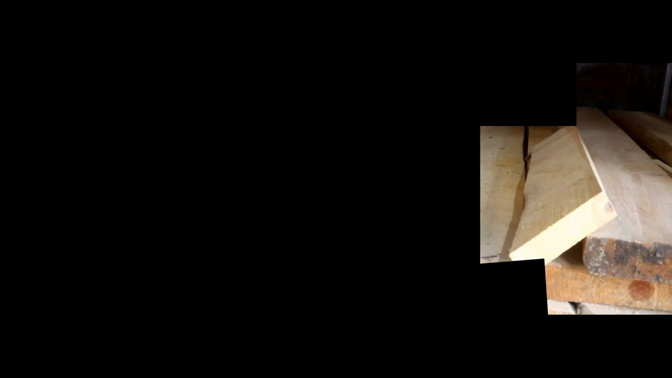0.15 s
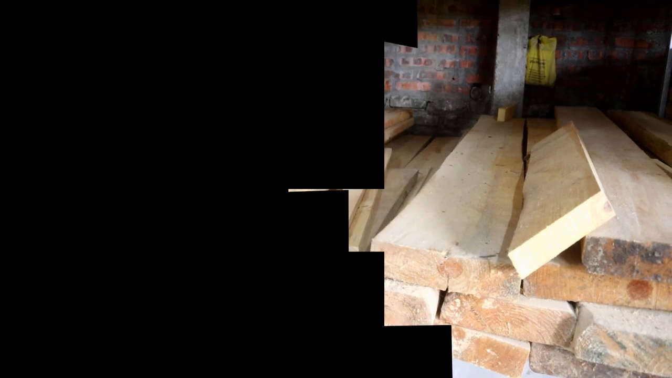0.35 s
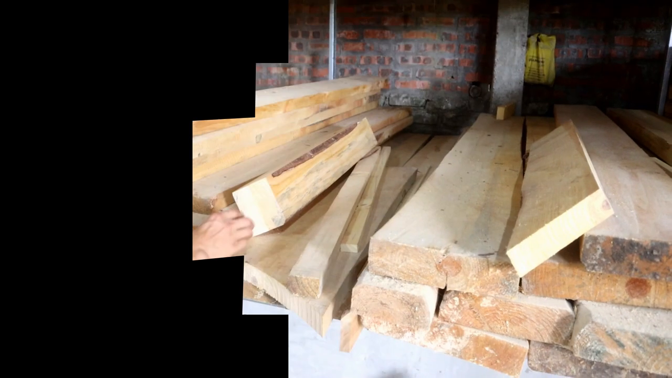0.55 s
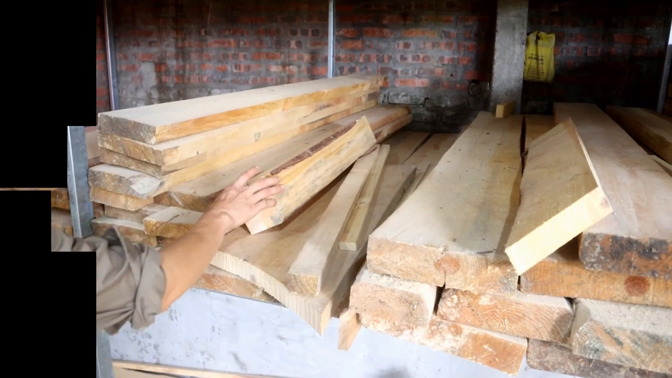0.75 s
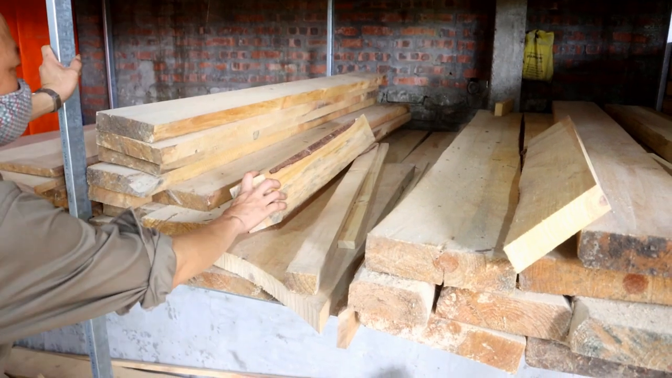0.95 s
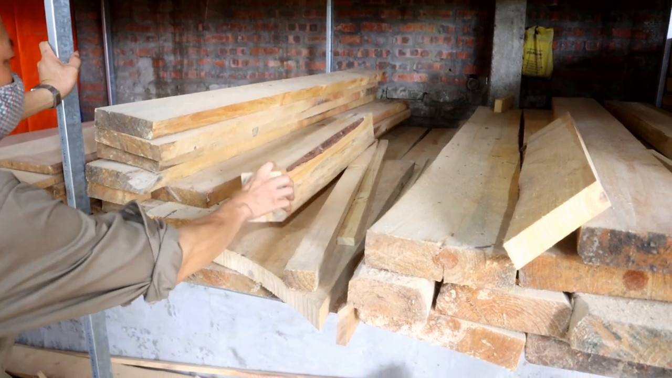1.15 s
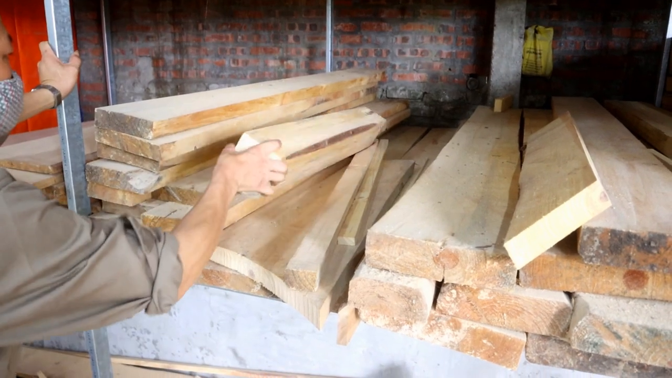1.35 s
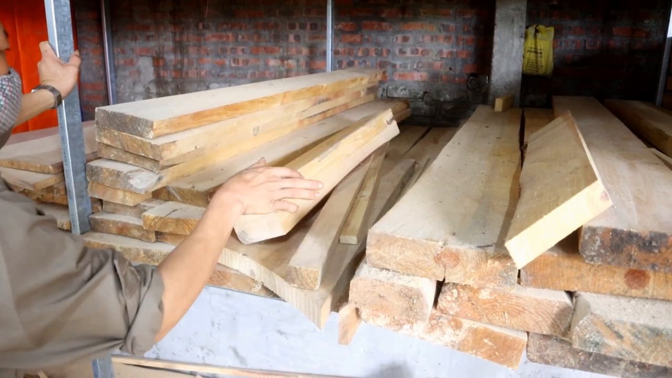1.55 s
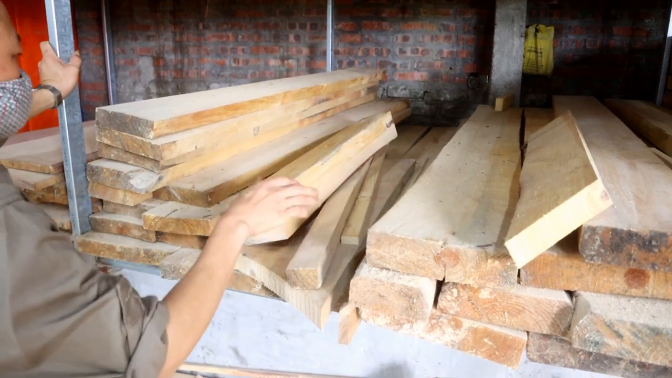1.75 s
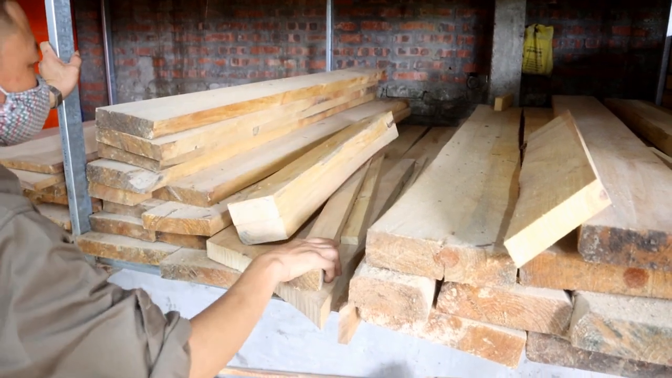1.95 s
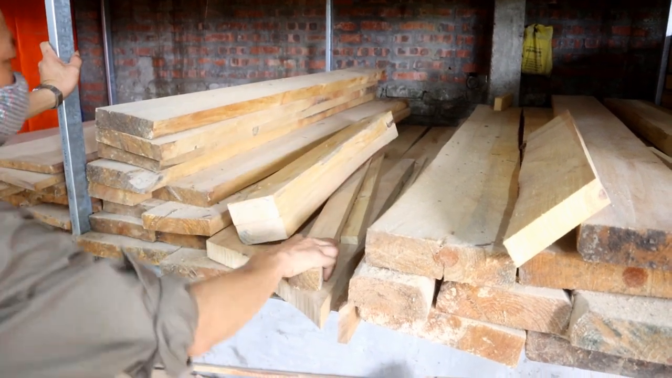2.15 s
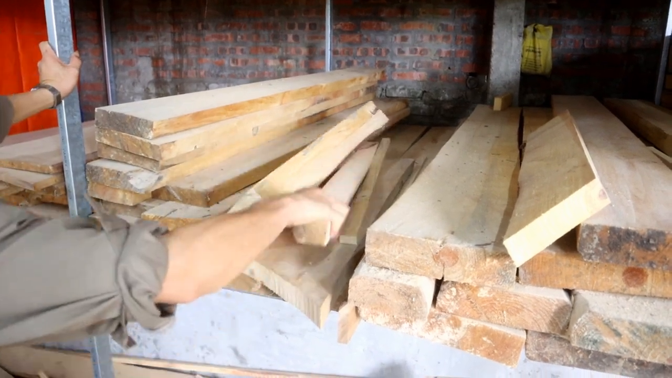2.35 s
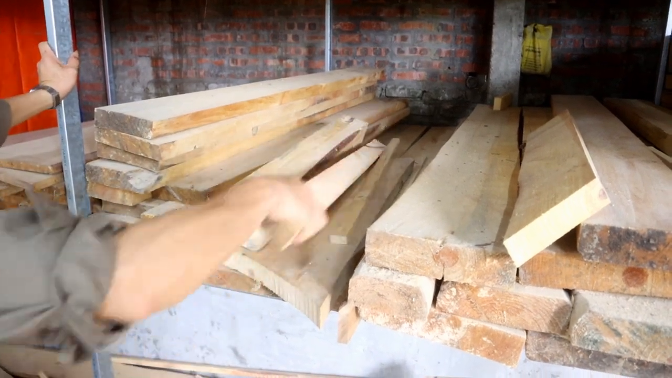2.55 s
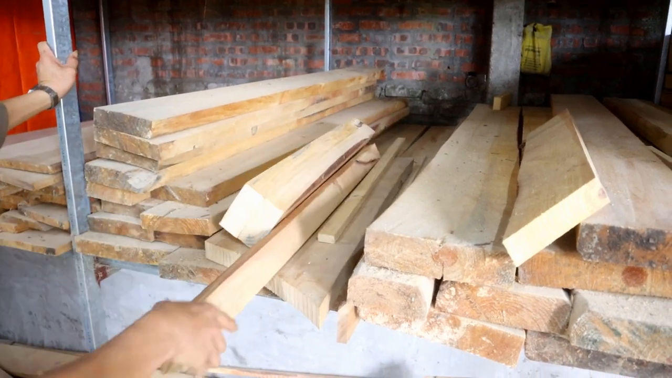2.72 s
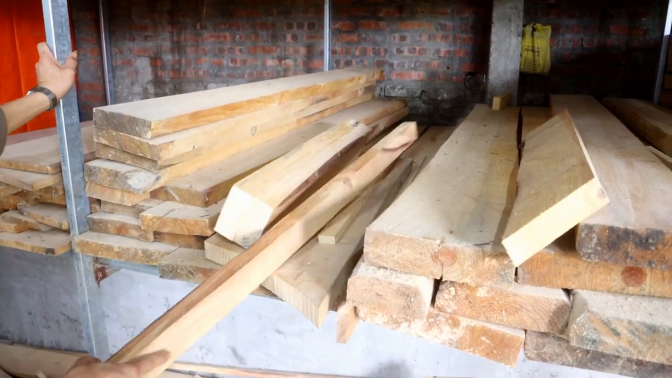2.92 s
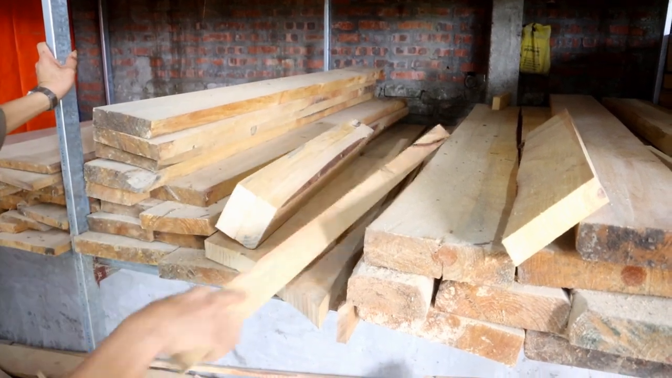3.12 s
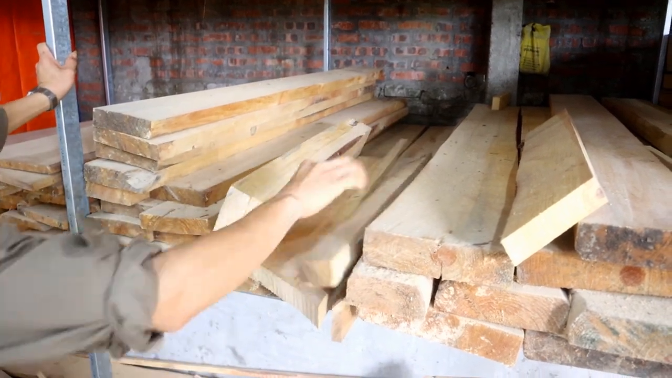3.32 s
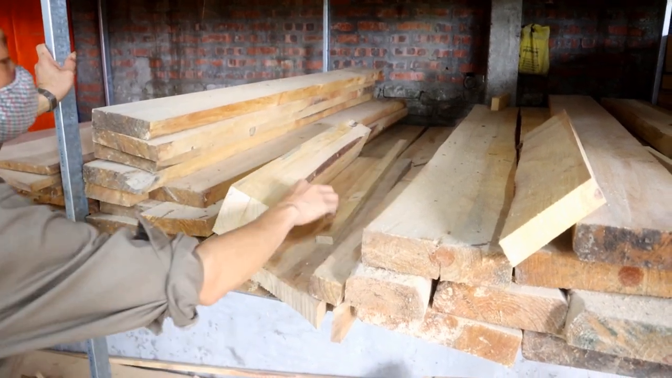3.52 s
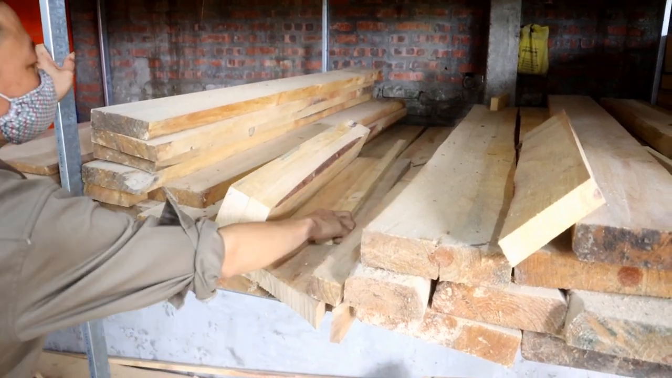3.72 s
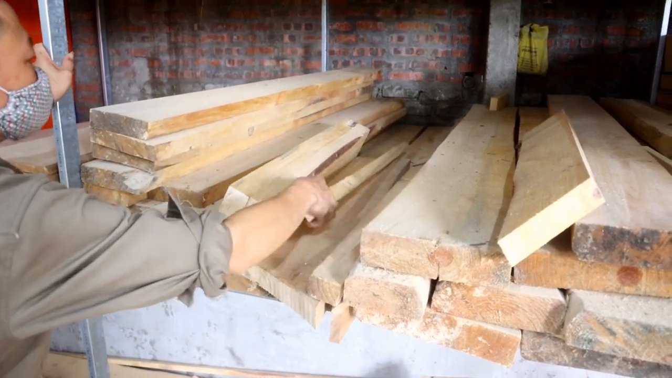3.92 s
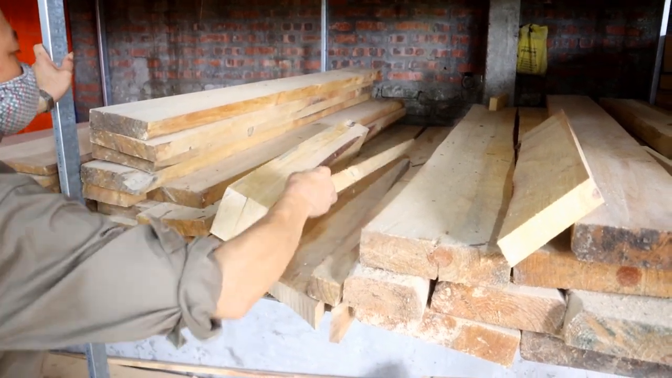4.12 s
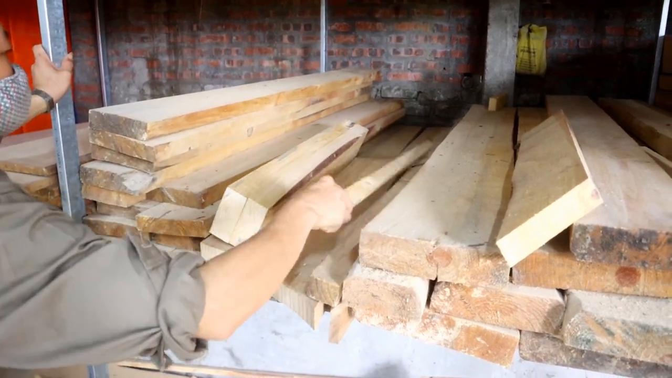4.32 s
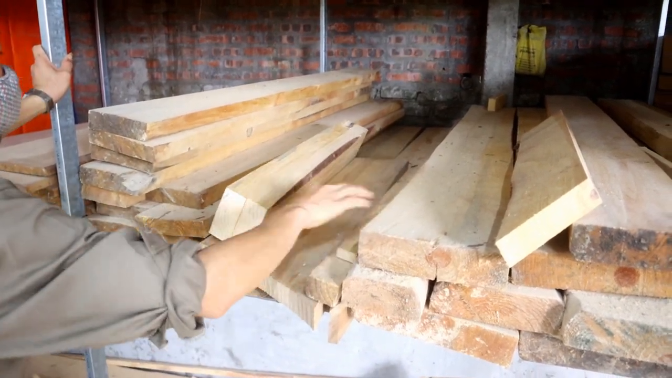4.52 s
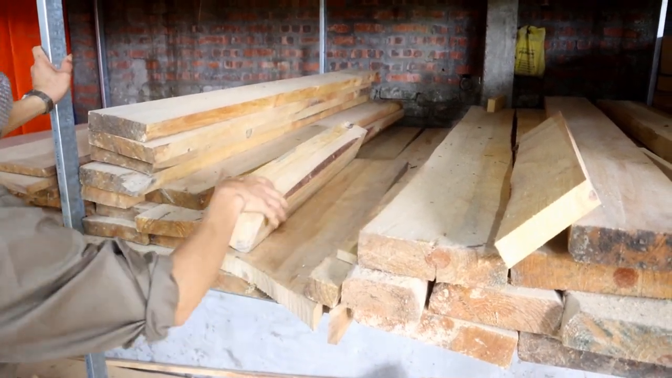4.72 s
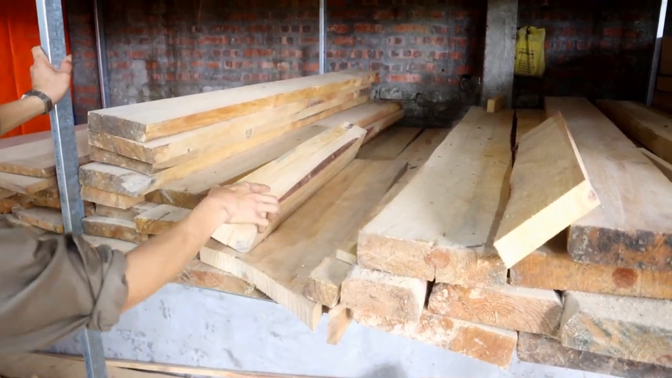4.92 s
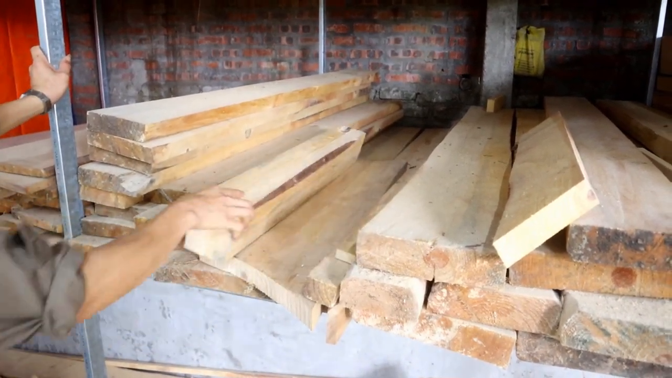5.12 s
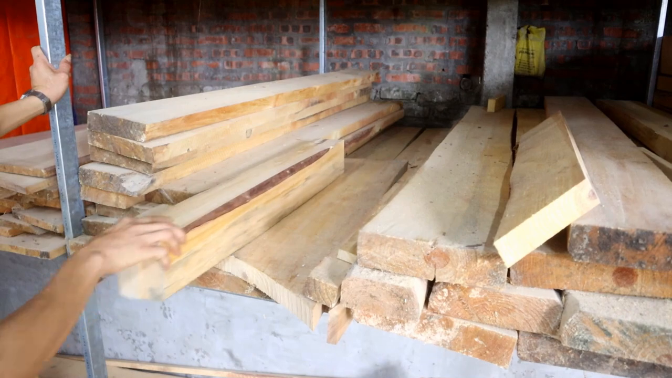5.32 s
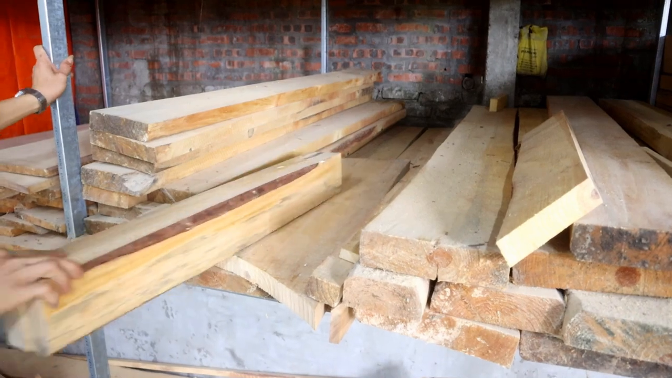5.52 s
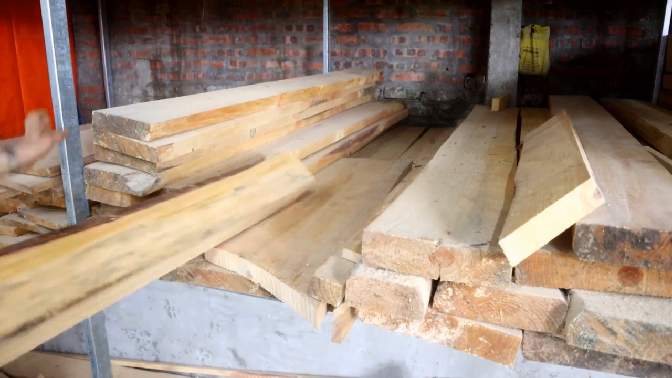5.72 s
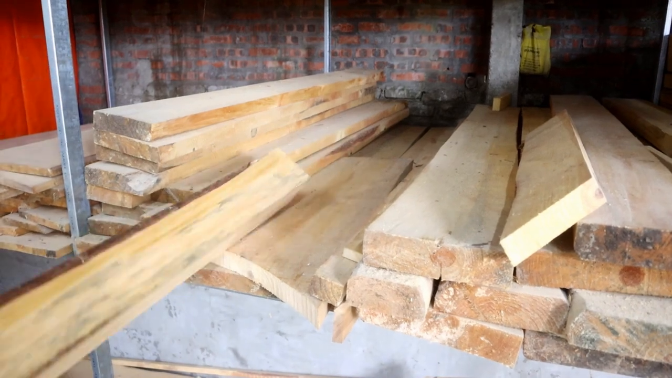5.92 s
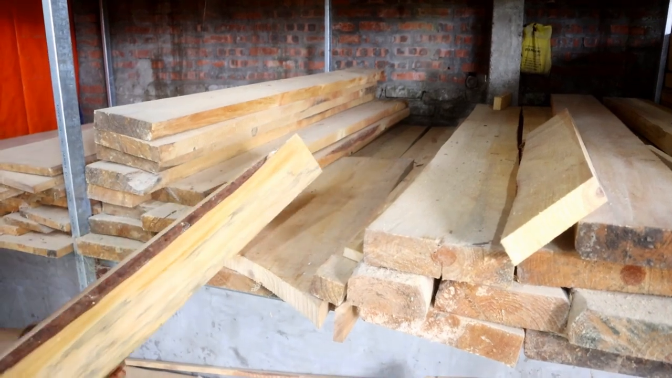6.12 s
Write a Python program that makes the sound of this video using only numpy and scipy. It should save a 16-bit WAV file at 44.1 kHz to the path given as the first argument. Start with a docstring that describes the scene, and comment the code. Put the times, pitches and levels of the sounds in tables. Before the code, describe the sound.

In an echoing brick workshop, sawn timber is sorted on a stack. Rough scraping and faint sleeve rustle lead to a hard, sharp beam knock with rocking bumps. A short squeak precedes another heavy drop, then a batten and a thin slat clatter. Finally a beam thumps and is dragged clear. A low throbbing hum and soft rumble continue underneath. Close stereo microphone.

```python
"""Sawn timber is sorted on a stack in a brick workshop, over a throbbing tone and a filtered-noise rumble.
Rough faces scrape as shaped, uneven noise and a sleeve rustles as brighter noise; then thick beams knock,
each blow exciting decaying modes and a dense noise ring of the pile, with sharp snaps and rocking bumps.
A wavering sine squeaks before a beam drops; a plank is struck, a batten and a thin slat clatter down,
and at last more beams land while one is pulled clear, ringing. Decaying noise gives the room echo."""
import sys
import numpy as np
from scipy import signal
from scipy.fft import rfft, irfft, next_fast_len
from scipy.io import wavfile
from scipy.ndimage import uniform_filter1d, map_coordinates

SR = 44100
rng = np.random.default_rng(int(sys.argv[2]) if len(sys.argv) > 2 else 0)


def materialize(psi):
    """Save the field psi as 16-bit PCM at rate SR to the path in sys.argv[1].

    A 1-D psi becomes a single channel; in a 2-D psi each row is a channel.
    """
    bounded = np.clip(np.atleast_2d(psi).T, -1, 1)
    quanta = np.round(bounded * 32767).astype(np.int16)
    wavfile.write(sys.argv[1], SR, quanta)


N = 271699
TIME = np.arange(N) / SR


def undb(db):
    """Amplitude gain is ten to the power of decibels over twenty."""
    return 10 ** (np.asarray(db) / 20)


def unit(x):
    """Normalization: scale to rms 1."""
    return x / np.sqrt(np.mean(x ** 2))


def curve(rows):
    """Linear interpolation joins (s, value) rows over time."""
    return np.interp(TIME, *np.transpose(rows))


def colour(x, points):
    """Minimum-phase filtering through (Hz, dB) points: a folded cepstrum makes the response causal."""
    size = next_fast_len(len(x) + 4096)
    hz, db = np.transpose(points)
    bins_hz = np.arange(size // 2 + 1) * SR / size
    log_gain = np.log(undb(np.interp(np.log(bins_hz + 1), np.log(hz), db)))
    cepstrum = irfft(log_gain, size)
    cepstrum[1:size // 2] *= 2
    cepstrum[size // 2 + 1:] = 0
    response = np.exp(rfft(cepstrum))
    return irfft(rfft(x, size) * response, size)[:len(x)]


def band(x, lo_hz, hi_hz):
    """Causal Butterworth band-pass, flat between its edges."""
    return signal.sosfilt(signal.butter(3, [lo_hz, hi_hz], "band", fs=SR, output="sos"), x)


def walk(rate):
    """Random modulation: noise drawn rate times a second, smoothed twice, with rms near 1."""
    k = int(SR / rate)
    steps = np.repeat(rng.standard_normal(N // k + 1), k)
    smooth = uniform_filter1d(uniform_filter1d(steps, k), k)
    return unit(smooth)[:N]


def fade(t, t60):
    """Exponential decay of a damped vibration, 60 dB down at t60 seconds."""
    return np.exp(-np.log(1000) * t / t60)


def ring(modes, t, scatter_db, detune):
    """Modal superposition: the point of contact sets the shares, the support shifts the pitches."""
    hz, db, t60 = np.transpose(modes)[:, :, None]
    share, shift, sign = rng.standard_normal((3, len(modes), 1))
    strength = np.sign(sign) * undb(db + scatter_db * share)
    vibration = np.sin(2 * np.pi * hz * (1 + detune * shift) * t)
    return np.sum(strength * fade(t, t60) * vibration, axis=0)


def grains(grain_db, rate, patchy_db):
    """Amplitude-modulated noise: dense tiny slips of uneven size, coming in mild patches."""
    sizes = np.repeat(rng.uniform(-1, 1, N // 64 + 1), 64)[:N]
    return rng.standard_normal(N) * undb(grain_db * sizes + patchy_db * walk(rate))


def hum(tone_db=1, rumble_db=4.5, waver=0.0299, depth_db=20, uneven_db=1):
    """Frequency and amplitude modulation: a wavering low tone throbs, over a rumble of filtered noise."""
    # centre of the wavering pitch: start_s, pitch_hz
    pitch = [(0, 111.9), (1.6, 119.4), (2.1, 115.6), (2.35, 93.2), (6.16, 88.5)]
    # throbs of the tone: start_s, throbs_per_s
    throb_rate = [(0.9, 7.6), (1.25, 5.6), (2.6, 7.3), (4.3, 8.1), (5.6, 7.0)]
    # tone at the top of a throb, before tone_db: start_s, level_db
    tone_level = [(0.1, -61), (0.6, -40.5), (1.4, -27), (2.0, -35.5), (2.5, -31), (3.3, -38.5),
                  (4.4, -42.5), (6.1, -33.5)]
    # rumble before rumble_db: start_s, level_db
    rumble_level = [(0.15, -65.5), (0.6, -48.5), (1.3, -40.5), (2.5, -39.5), (4.1, -47), (5.7, -47)]
    # rumble spectrum: frequency_hz, level_db
    rumble_points = [(20, -16.5), (48, -2.5), (110, 2.5), (165, -3), (240, -8), (400, -19), (2000, -73)]
    beat = np.cumsum(curve(throb_rate)) / SR
    throb_db = uneven_db * walk(6.1) - depth_db * np.sin(np.pi * beat + np.pi / 3) ** 2
    wavering_hz = curve(pitch) * (1 + waver * walk(20))
    tone = np.sqrt(2) * np.sin(2 * np.pi * np.cumsum(wavering_hz) / SR)
    rumble = unit(colour(rng.standard_normal(N), rumble_points))
    rumble = rumble * undb(curve(rumble_level) + rumble_db)
    return tone * undb(curve(tone_level) + throb_db + tone_db) + rumble


def sliding(stroke_power=0.83, stroke_t60_s=0.61):
    """Friction noise grows with speed: each stroke accelerates, then dies away; powers add."""
    # boards pushed or pulled over the pile, relative levels: start_s, stop_s, scrape_db, splinter_hiss_db
    strokes = [(0.104, 1.58, -46, -64), (1.7, 2.331, -49.5, -74.5), (1.77, 1.839, -39.5, -76),
               (2.323, 2.618, -39.5, -54), (2.725, 2.893, -35.5, -66), (3.095, 4.186, -57.5, -73),
               (3.92, 4.5, -58.5, -72), (5.145, 5.388, -40.5, -53.5), (5.45, 5.601, -44, -54),
               (5.646, 5.744, -43, -53), (5.77, 6.125, -49, -58)]
    power = 0
    for start, stop, scrape_db, hiss_db in strokes:
        speed = np.clip((TIME - start) / (stop - start), 0, 1) ** stroke_power
        speed = speed * fade(np.maximum(TIME - stop, 0), stroke_t60_s)
        power = power + np.outer(undb([scrape_db, hiss_db]), speed) ** 2
    return np.sqrt(power)


def scrape(strength, modes_db=-5, level_db=3, pull_s=5.55, pull_length_s=0.27):
    """Stick-slip of sawn faces sounds the pile; slips also drive the shifting modes of a beam pulled clear."""
    # modes of the dragged beam: frequency_hz, level_db, t60_s
    drag_modes = [(560, -2.5, 0.056), (1050, 0, 0.023), (1220, 5.5, 0.043), (1652, 0.5, 0.067),
                  (1980, 3.5, 0.015)]
    # scrape spectrum: frequency_hz, level_db
    scrape_points = [(100, -9), (250, 6.5), (740, 5), (950, 1), (1250, -1), (2300, -6.5), (3500, -16),
                     (6000, -26), (12000, -56.5)]
    slips = grains(grain_db=7, rate=45, patchy_db=1.6)
    response = ring(drag_modes, TIME[:SR // 2], scatter_db=0.0, detune=0)
    beam = signal.fftconvolve(slips, response)[:N]
    # reading the ringing at an uneven pace shifts its modes
    reading_points = np.cumsum(1 + .035 * walk(18))
    beam = map_coordinates(beam, [reading_points], mode="mirror") * undb(3 * walk(35))
    pulled = np.exp(-((TIME - pull_s) / pull_length_s) ** 2)
    rubbing = unit(slips) + undb(modes_db) * pulled * unit(beam)
    return unit(colour(rubbing, scrape_points)) * strength * undb(level_db)


def rustle(splinters, level_db=2, rest_db=-73, reach_s=0.059):
    """Broadband friction noise: sleeve and splinters brush the wood, their powers adding."""
    # arm reaches, before level_db: centre_s, level_db
    reaches = [(0.64, -66), (1.291, -55.5), (2.44, -62), (3.92, -64), (4.33, -64.5), (4.831, -63),
               (5.03, -64)]
    # brushing spectrum: frequency_hz, level_db
    cloth_points = [(800, 6), (2500, 12.5), (4500, 7), (7000, -1.5), (9000, -10), (13000, -20.5),
                    (16000, -41)]
    brushing = grains(grain_db=5, rate=25, patchy_db=1.5)
    sleeve = undb(rest_db) + sum(undb(db) * np.exp(-((TIME - s) / reach_s) ** 2) for s, db in reaches)
    return unit(colour(brushing, cloth_points)) * np.hypot(splinters, sleeve) * undb(level_db)


def knocks(rows, modes, modes_db, detune, thock_db, pile_t60, contact_db, attack_s, bands_db):
    """Impact excitation: a contact crunch, a thock, the piece's modes and the pile's dense ring."""
    # pile spectrum: frequency_hz, level_db
    pile_points = [(40, -6), (110, 8.5), (220, 5), (500, 4.5), (750, 5), (1050, 4), (1450, 10.5),
                   (2500, -1), (3600, -7), (5000, -14), (7000, -20), (14000, -66.5)]
    # edges between thud, body, clack and crack: frequency_hz
    edges_hz = [45, 250, 900, 2800, 13000]
    # a deep thock comes with a heavy thud
    thud_db_per_octave, thud_pivot_hz = -7, 392
    # a hard edge is brighter than a flat face: gain from softest to hardest
    hard_clack_db, hard_crack_db = 21.5, 45
    out, t = np.zeros(N + SR), np.arange(SR // 2) / SR
    for s, level_db, hardness, thock_hz in rows:
        envelope = fade(t, pile_t60) + undb(contact_db) * fade(t, 0.058)
        dense = rng.standard_normal(len(t)) * envelope
        # wood gives before the pile takes the blow, and for longer when the blow is gentle
        give_s = np.clip(attack_s * undb(-2 * level_db - 22), .0005, .005)
        dense *= 1 - np.exp(-t / give_s)
        thock = undb(thock_db) * np.sin(2 * np.pi * thock_hz * t) * fade(t, 0.06)
        piece = undb(modes_db) * ring(modes, t, scatter_db=4.0, detune=detune)
        blow = colour(dense + thock + piece, pile_points)
        thud, body, clack, crack = (band(blow, lo, hi) for lo, hi in zip(edges_hz, edges_hz[1:]))
        # wood soaks up the crack quickly
        parts = np.array([thud * fade(t, 0.64), body, clack, crack * fade(t, 0.24)])
        thud_tilt_db = thud_db_per_octave * np.log2(thock_hz / thud_pivot_hz)
        tilt_db = np.array([thud_tilt_db, 0, hard_clack_db * hardness, hard_crack_db * hardness])
        # each band is levelled over its first 25 ms
        gains = undb(level_db + np.array(bands_db) + tilt_db) / np.std(parts[:, :SR // 40], axis=1)
        out[int(s * SR):][:len(t)] += gains @ parts
    return out[:N]


def beam_knocks():
    """Bending and twisting modes of thick beams, excited by impact and by rocking."""
    # blows: start_s, relative level_db, hardness (0-1), thock pitch_hz
    blows = [(0.287, -35, 0.7, 855), (1.254, -23.5, 0, 722), (1.268, -23.5, 0, 347), (1.665, -30, 0.3, 396),
             (1.679, -21.5, 0.2, 597), (1.698, -11, 0.62, 1390), (1.7, -19, 0.05, 308),
             (1.704, -12, 0.5, 707), (1.718, -13, 0.4, 814), (1.792, -20.5, 0, 675),
             (1.861, -16.5, 0.3, 278), (1.876, -14.5, 0.2, 706), (2.606, -19, 0.5, 210),
             (2.65, -8, 0.08, 536), (2.692, -22, 0.03, 573), (2.785, -16.5, 0, 658), (2.824, -18, 0, 712),
             (2.876, -12.5, 0.4, 386), (2.889, -15.5, 0.1, 231.5), (2.921, -16, 0.2, 372),
             (3.24, -31.5, 0.76, 584), (3.248, -19.5, 0, 318), (3.262, -22.5, 0, 478),
             (3.296, -39, 0.93, 592), (3.609, -13.5, 0.15, 640), (5.016, -40, 1, 308),
             (5.264, -28.5, 0, 165), (5.378, -9.5, 0.05, 342), (5.45, -21.5, 0.4, 263),
             (5.517, -35, 1, 506), (5.926, -11, 0.08, 427), (5.942, -14, 0.15, 595), (6.094, -14, 0, 298),
             (6.107, -23, 0.3, 805)]
    # modes before detuning and scatter: frequency_hz, level_db, t60_s
    modes = [(101, -7, 0.3), (167, -0.5, 0.089), (220.3, -3.5, 0.33), (319.8, 3.5, 0.078),
             (371, 5.5, 0.082), (410.4, -1, 0.31), (555.6, 4.5, 0.09), (686, -2.5, 0.18), (717, 4.5, 0.028),
             (1400, 4, 0.024), (1630, -5, 0.051), (1970, 1, 0.1)]
    # bands_db, here and below: thud, body, clack and crack of the softest contact
    return knocks(blows + settling(), modes, modes_db=-20, detune=0.0096, thock_db=-6.5, pile_t60=0.15,
                  contact_db=-1.5, attack_s=0.0014, bands_db=[-12.5, -7.5, -28.5, -60.5])


def snaps(snap_t60=0.0089, splinter_db=-22, clack_hz=1200, clack_t60=0.038):
    """Impulsive contact: a corner bites in a bright click with a splintery tail and an octave-wide clack."""
    # hard edges snapping, levels before the final colouring and halving: start_s, click_db, clack_db
    bites = [(1.2719, -29.5, -45), (1.7016, -13.5, -7), (2.6517, -21, -24), (3.437, -22.5, -26),
             (3.551, -33, -8.5), (4.664, -36, -28), (5.38, -31, -15.5), (5.943, -40, -17.5),
             (2.967, -44.5, -21)]
    (click, clack), t = np.zeros((2, N)), np.arange(SR // 10) / SR
    for s, click_db, clack_db in bites:
        bite, wood = rng.standard_normal((2, len(t)))
        splintery = fade(t, snap_t60) + undb(splinter_db) * fade(t, 0.092)
        click[int(s * SR):][:len(t)] += undb(click_db) * bite * splintery
        woody = unit(band(wood, clack_hz / np.sqrt(2), clack_hz * np.sqrt(2)))
        clack[int(s * SR):][:len(t)] += undb(clack_db) * woody * fade(t, clack_t60)
    bright = colour(click, [(200, 2), (2600, 3), (6000, -13), (8500, -13), (11000, -27.5), (14000, -27)])
    return clack / 2 + bright


def settling(count=7, hardness=0.089, thock_hz=520, spread_octaves=.4, ends_db=-5):
    """Repeated impact: a rocking beam gives soft, uneven bumps, strongest midway, as rows of blows."""
    # dropped beams rocking: start_s, length_s, relative level_db
    rockings = [(1.803, 0.17, -22), (2.67, .2, -18), (5.398, 0.063, -29)]
    rows = []
    for start, length, level_db in rockings:
        slip, pitch = rng.uniform(-1.1, 1, (count, 2)).T
        along = (np.arange(count) + .5 + slip / 2) / count
        for u, p in zip(along, pitch):
            bump_db = level_db + ends_db * (2 * u - 1) ** 2
            rows.append((start + length * u, bump_db, hardness, thock_hz * 2 ** (spread_octaves * p)))
    return rows


def squeak(hz=2300, level_db=-35, start_s=2.556, stop_s=2.651):
    """Stick-slip oscillation: a rough squeak of jittered pitch and level grows until the beam drops."""
    phase = 2 * np.pi * np.cumsum(hz * (1 + .016 * walk(700))) / SR
    growth = np.clip((TIME - start_s) / (stop_s - start_s), 0, 1)
    pressure = growth * np.clip((stop_s - TIME) / .004, 0, 1)
    return undb(level_db + 3 * walk(300)) * np.sin(phase) * pressure


def plank_knocks():
    """Modes of the plank underneath, excited by impact of the batten's far end."""
    # blows: start_s, relative level_db, hardness (0-1), thock pitch_hz
    blows = [(2.954, -17, 0.27, 972), (2.964, -23, 0.28, 1240), (3.518, -23.5, 0.79, 327),
             (3.543, -12, 0.39, 697), (3.553, -11.5, 0.39, 470)]
    # modes before detuning and scatter: frequency_hz, level_db, t60_s
    modes = [(213, 3, 0.071), (961, -9.5, 0.059), (1070, -10.5, 0.1), (1374, 0, 0.16), (1658, 14, 0.12),
             (1640, -5.5, 0.053), (1900, 4, 0.12)]
    return knocks(blows, modes, modes_db=-8.5, detune=0.014, thock_db=-4.0, pile_t60=0.18,
                  contact_db=4.5, attack_s=0.00044, bands_db=[-7.5, -8, -21.5, -49.5])


def batten_knocks():
    """Bending and twisting modes of a long batten, excited as it clatters down."""
    # blows: start_s, relative level_db, hardness (0-1), thock pitch_hz
    blows = [(3.407, -14, 0.72, 533), (3.415, -17.5, 0.59, 896), (3.428, -17, 0.95, 490),
             (3.436, -16, 0.83, 360), (3.462, -14.5, 0, 730), (3.473, -20, 0, 743)]
    # modes before detuning and scatter: frequency_hz, level_db, t60_s
    modes = [(234, -4.5, 0.23), (400, -7.5, 0.14), (1253, -4.5, 0.15), (1916, 3.5, .09), (2200, 0.5, 0.061),
             (2574, 5, 0.043), (3090, 0, 0.04), (3440, -0.5, 0.042)]
    return knocks(blows, modes, modes_db=-11.5, detune=0.0066, thock_db=-10.5, pile_t60=0.18,
                  contact_db=-4, attack_s=0.00086, bands_db=[-11.5, -7.5, -29.5, -54.5])


def slat_knocks():
    """Bending and twisting modes of a thin slat, excited as it falls."""
    # blows: start_s, relative level_db, hardness (0-1), thock pitch_hz
    blows = [(4.54, -18, 0.42, 1034), (4.553, -16.5, 0.49, 1350), (4.651, -14.5, 0.43, 980),
             (4.667, -13.5, 0.55, 495), (4.694, -24, 0.241, 1270)]
    # modes before detuning and scatter: frequency_hz, level_db, t60_s
    modes = [(229.3, 2, 0.15), (336, -6.5, 0.14), (460, -4.5, 0.079), (583, -6.5, 0.17), (863, -8, 0.23),
             (988, -1, 0.13), (1192, -0.5, 0.046), (1246, -2, 0.28), (1334, -1.5, 0.17), (1370, -6, 0.14),
             (1654, -12, 0.11), (2035, 0, 0.079), (2472, 7.5, 0.093), (3540, 5.5, 0.076), (3970, 3, 0.032)]
    return knocks(blows, modes, modes_db=-12.5, detune=0.012, thock_db=-6.5, pile_t60=0.25,
                  contact_db=-14, attack_s=0.00064, bands_db=[-15.5, -9.0, -18.0, -50.5])


def workshop(x, wet_db=-8, build_s=0.0017, apart_hz=2200, absorb_hz=4500):
    """Diffuse reverberation of brick walls: lows linger and are alike at both ports, highs die early and differ."""
    # room decay: frequency_hz, t60_s
    room_decay = [(100, 1), (260, 0.92), (1800, 0.74), (4800, 0.53), (12000, 0.49)]
    t, response = TIME[:SR], 0
    hz, t60 = np.transpose(room_decay)
    for lo in 50 * 2. ** np.arange(8):  # octave bands
        mid, side = band(rng.standard_normal((2, SR)), lo, 2 * lo)
        apart = min(lo / apart_hz, 1)
        pair = (mid + apart * side * np.array([[1], [-1]])) / np.sqrt(1 + apart ** 2)
        band_t60 = np.interp(np.log(lo * np.sqrt(2)), np.log(hz), t60)
        response = response + pair / (1 + (lo / absorb_hz) ** 4) * fade(t, band_t60)
    response = response * (1 - np.exp(-t / build_s))
    response = response / np.sqrt(np.sum(response[0] ** 2))
    return undb(wet_db) * signal.fftconvolve(x, response, axes=1)[:, :N]


def ports(pair):
    """Interaural-style phase difference: the right microphone port leads the left."""
    # lead of right over left: frequency_hz, phase_rad
    port_phase = [(60, 0.027), (160, 0.36), (340, 0.99), (700, 0.98), (2000, 1.45), (5000, 2.3)]
    size = next_fast_len(N + 4096)
    lead = np.interp(np.arange(size // 2 + 1) * SR / size, *np.transpose(port_phase))
    turn = np.exp(.5j * lead * np.array([[-1], [1]]))
    return irfft(rfft(pair, size) * turn, size)[:, :N]


def scene():
    """Superposition of direct sound and echo: wood in the room, with the close rustle and the hum."""
    # where the wood is struck: start_s, left minus right pan_db, echo_db sent to the room
    bearing = [(1.7, 2.5, -4.5), (1.88, 2.5, 0), (2.65, 0.5, -4), (3.399, -0.2, -4), (4.6, 0.2, -4),
               (5.4, 0.5, -2.5), (5.9, 0.7, -5)]
    times, pan_db, echo_db = np.transpose(bearing)
    rubbing, splinters = sliding()
    struck = beam_knocks() + snaps() + plank_knocks() + batten_knocks() + slat_knocks()
    pan = undb(np.interp(TIME, times, pan_db) * np.array([[.5], [-.5]]))
    wood = (struck + scrape(rubbing)) * pan
    echo = workshop(wood * undb(np.interp(TIME, times, echo_db)))
    low = hum() * undb(np.array([[.6], [-.6]]))
    # the rustle is drawn afresh for each channel
    close = np.array([rustle(splinters), rustle(splinters)])
    return ports(wood + squeak() + echo + low) + close


def record(dry, drive=0.17, top_hz=13900):
    """Saturation and low-pass filtering: it opens after 0.1 s, rounds the loudest peaks and cuts the top."""
    opened = dry * np.clip((TIME - .1) / .01, 0, 1)
    rounded = np.tanh(drive * opened) / drive
    return signal.sosfilt(signal.ellip(8, .2, 70, top_hz, fs=SR, output="sos"), rounded)


dry = scene()
out = record(dry)
materialize(out)
```